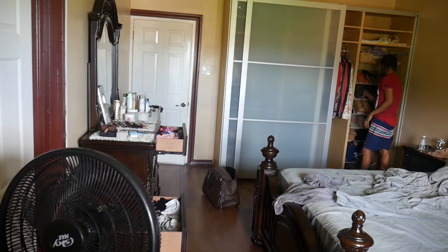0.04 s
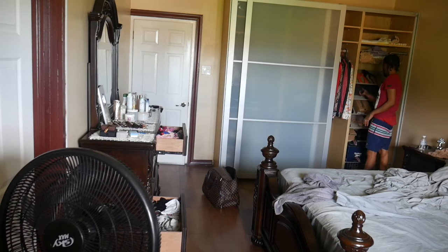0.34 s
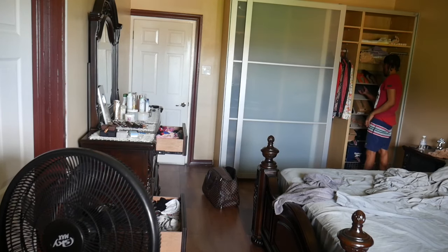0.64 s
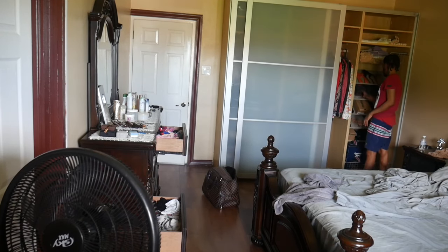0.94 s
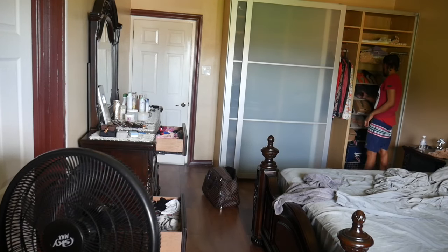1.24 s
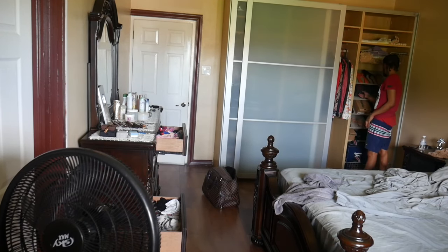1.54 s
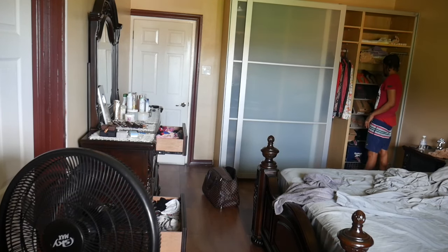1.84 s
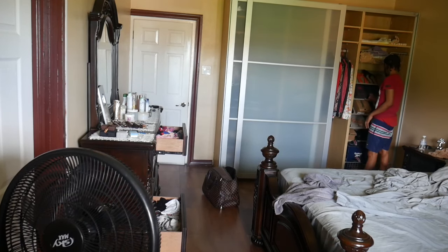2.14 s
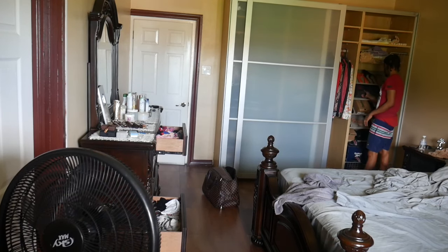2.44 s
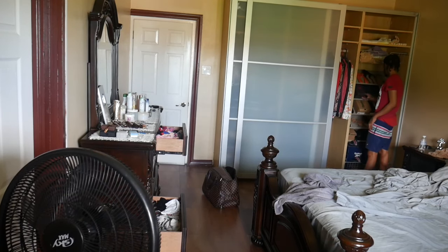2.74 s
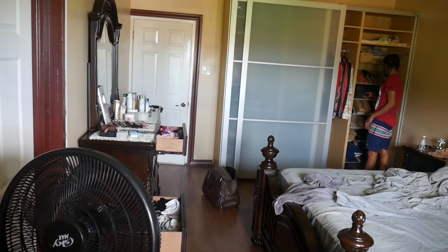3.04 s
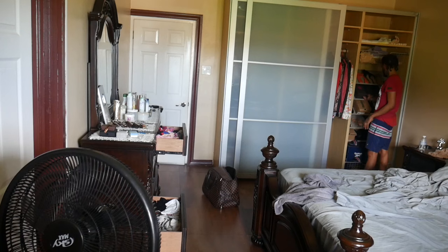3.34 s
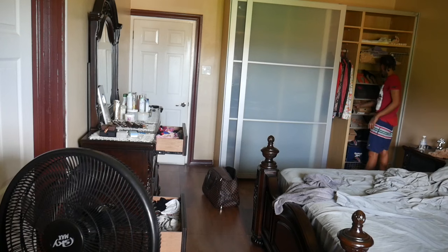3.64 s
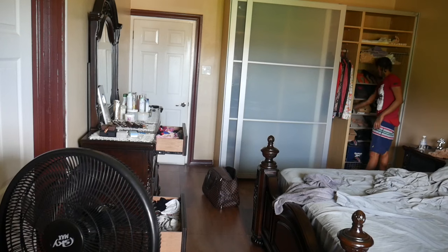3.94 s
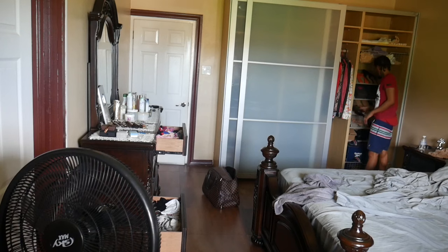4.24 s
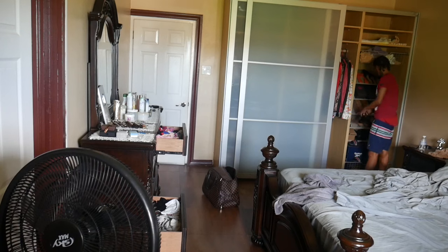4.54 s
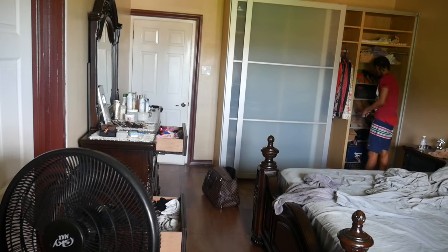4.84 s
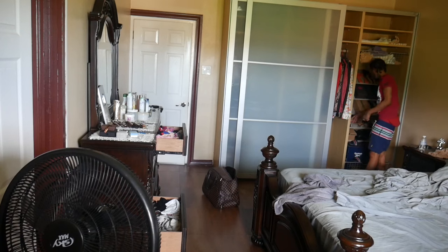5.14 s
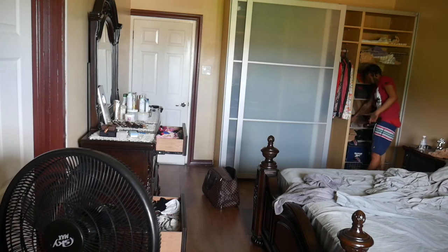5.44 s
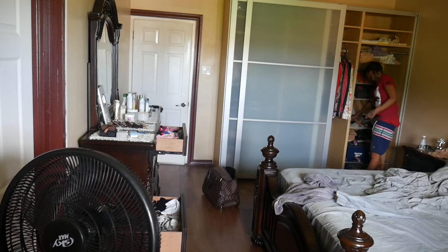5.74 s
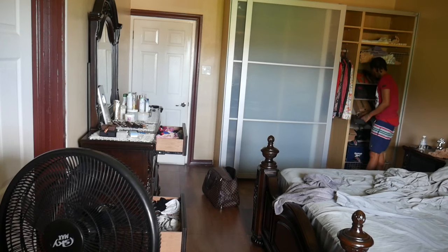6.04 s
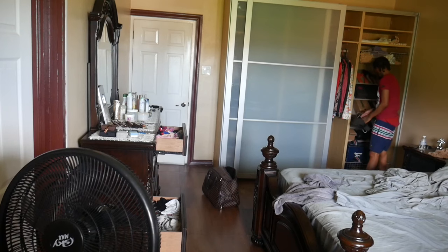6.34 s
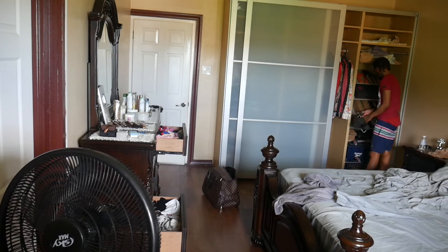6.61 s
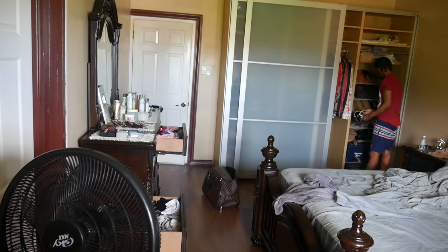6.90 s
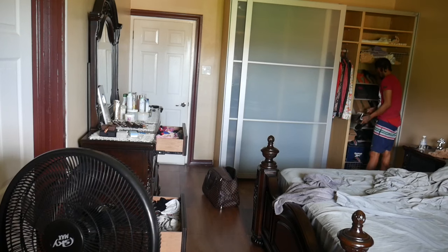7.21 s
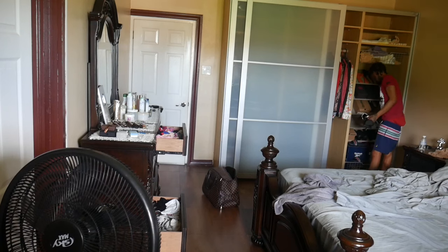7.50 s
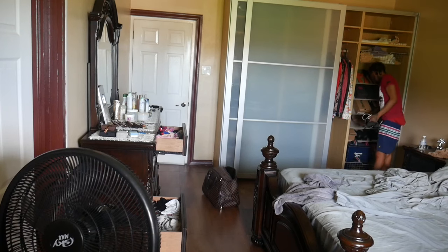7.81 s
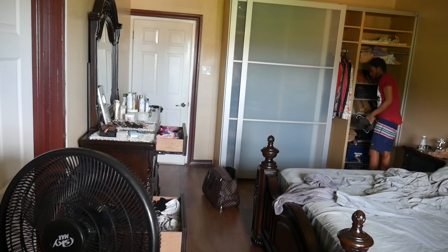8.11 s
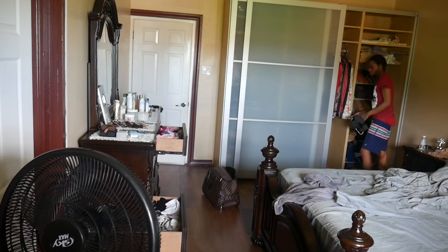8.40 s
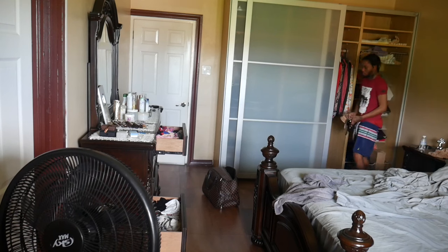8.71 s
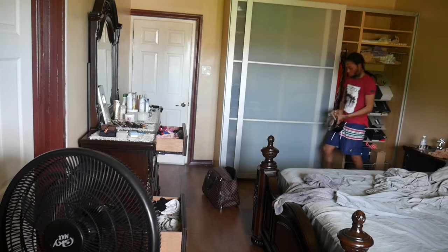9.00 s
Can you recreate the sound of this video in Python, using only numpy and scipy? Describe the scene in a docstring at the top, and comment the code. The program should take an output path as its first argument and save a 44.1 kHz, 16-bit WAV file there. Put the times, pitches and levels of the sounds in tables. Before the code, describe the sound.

Someone rummages through a wardrobe in a small, hard-floored bedroom. Things drag along a shelf and clothes rustle, then irregular wooden knocks set hangers, boxes and panels briefly ringing, the hardest about four seconds in. A lull, another scrape and a second lull lead to a last flurry of dragging, knocking and rustling. The microphone is across the room, picking up a short echo and a low steady hum.

```python
"""A small, hard-floored bedroom, the microphone across the room from a wardrobe where someone rummages.
Over a low steady hum, things are dragged along a shelf and clothes rustle. Knocks on the wood follow and
set hangers, boxes and panels ringing; the hardest lands at about 4 s. After a lull comes another scrape,
then a second lull, and from 7.4 s a last flurry of dragging, knocking and rustling.
The handling reaches the microphone through the room's short echo."""
import sys
import numpy as np
from scipy import signal
from scipy.fft import rfft, irfft, next_fast_len
from scipy.io import wavfile
from scipy.ndimage import uniform_filter1d

SR = 44100
rng = np.random.default_rng(int(sys.argv[2]) if len(sys.argv) > 2 else 0)


def wav_record(signal):
    """Record a signal, one row per channel, as 16-bit PCM in the file named by sys.argv[1]."""
    frames = np.transpose(np.atleast_2d(signal))
    bounded = np.clip(frames, -1, 1)
    # unit amplitude maps onto the largest positive 16-bit level
    quanta = np.round(bounded * 32767).astype(np.int16)
    wavfile.write(sys.argv[1], SR, quanta)


N = 408366
TIME = np.arange(N) / SR

# The wood's four registers: thud, body, clack, tick. Each row: low edge in Hz, high edge in Hz.
REGISTERS = [(45, 220), (220, 800), (800, 3200), (3200, 15000)]
# The things that ring in the wardrobe, named in the table of bumps.
# Each row: centre of a cluster of modes in Hz, its width in Hz, level in dB, t60 in seconds.
HANGER = [(814, 12, 5.5, 0.1), (2870, 950, -9.5, 0.12)]
SMALL_BOX = [(296, 41, 0, 0.62)]
LARGE_BOX = [(174, 6.7, -11.5, .48), (254, 12.3, -2, 0.47), (315, 9.4, -1, 0.43), (345, 8.4, -8.5, 0.51)]
THIN_PANEL = [(421, 36, 0, 0.099)]
SIDE_WALL = [(67.8, 4, -15, 0.87), (108, 14, -6.5, 0.93), (130, 55, -1, 0.4), (189.4, 26, -14.5, 0.32)]
SHELF = [(574, 30, -1, 0.45), (941, 47, 1.5, 0.22), (2970, 480, -9.5, 0.34)]
HARD_BOARD = [(577, 20, 2, 0.19), (1287, 12, -6.5, 0.58), (1622, 6, -1.5, .39), (1664, 8, -4.5, .37),
              (1987, 8, -1.5, .52), (2680, 14, -4, .43), (2730, 8.3, -42, 1.8), (3320, 190, -7, 0.39),
              (11000, 4400, -22, 0.57)]
SCUFFED_EDGE = [(2226, 1000, 0, 0.39)]
SCUFFED_BOARD = [(487, 90, -5.5, 0.46), (960, 91, -2, 0.48), (1260, 60, -4, 0.47), (1518, 180, -5.5, 0.38)]


def amp(db):
    """Decibels to gain."""
    return 10 ** (np.asarray(db) / 20)


def evened(x):
    """Scales each row to an rms of 1."""
    return x / np.sqrt(np.mean(x ** 2, axis=-1, keepdims=True) + 1e-20)


def spectrum(points, hz):
    """Gain of a (Hz, dB) table on a log-frequency axis."""
    f, db = np.transpose(points)
    return amp(np.interp(np.log(hz + 1), np.log(f + 1), db))


def coloured(x, gain):
    """Filters each row by gain(Hz), to an rms of 1."""
    count = x.shape[-1]
    size = next_fast_len(count)
    shaped = rfft(x, size) * gain(np.fft.rfftfreq(size, 1 / SR))
    return evened(irfft(shaped, size)[..., :count])


def add(mix, s, sound):
    """Lays a sound into the mix at s seconds."""
    part = mix[round(s * SR):][:len(sound)]
    part += sound[:len(part)]


def wander(count, hz):
    """A random curve that glides to a new value hz times a second."""
    steps = rng.standard_normal(4000)
    return np.interp(np.arange(count) / SR * hz, np.arange(len(steps)), steps)


def still_room(air_db=-52, waver=0.2):
    """Low rumble of the house with a few wavering tones."""
    # Each row: frequency in Hz, relative level of the room's air in dB.
    air_colour = [(12, -43), (20, -13), (41, -10), (103, -2.5), (333, -9.5), (372, -17.5), (404, -16.5),
                  (649, -23), (767, -22), (857, -22.5), (1720, -26.5), (1920, -26.5), (2610, -28.5),
                  (3450, -36), (15500, -43.5)]
    # Each row: pitch of a tone in Hz, level in dB.
    tones = [(101, -60), (155, -64.5), (2700, -81)]
    air = amp(air_db) * coloured(rng.standard_normal(N), lambda hz: spectrum(air_colour, hz))
    hum = sum(amp(db) * np.sin(2 * np.pi * hz * TIME + wander(N, 5)) * (1 + waver * wander(N, 4))
              for hz, db in tones)
    return air + np.sqrt(2) * hum


def microphone_hiss(level_db=-77):
    """The microphone's own faint, steady noise."""
    # Each row: frequency in Hz, relative level in dB.
    colour = [(100, 1.5), (1000, -4), (4000, -20.5), (7000, -10.5), (12000, -1.5), (15500, -2.5)]
    return amp(level_db) * coloured(rng.standard_normal(N), lambda hz: spectrum(colour, hz))


def stroke(start, length, crest):
    """Speed of one arm movement, 0 to 1: fastest at the share `crest` of its length."""
    progress = np.clip((TIME - start) / length, 0, 1)
    skew = np.log(.5) / np.log(crest)
    return np.sin(np.pi * progress ** skew)


def wardrobe(push, register):
    """One register of the wardrobe's answer to a push: broad colour with panel resonances."""
    # Wood heard across the room. Each row: frequency in Hz, relative level in dB.
    wood = [(35, -29), (55, 5.5), (110, -1), (300, 1.5), (450, -2.5), (1000, -3.5), (2300, -8.5),
            (3100, -15.5), (4000, -24.5), (7000, -34), (11000, -44.5), (15500, -54)]
    # Panel and shelf resonances. Each row: centre in Hz, width in Hz, dB above the broad colour.
    panels = [(70, 20, 2.5), (112, 15, 7.5), (158.7, 8.7, 12.5), (235.6, 8.2, 6.5), (319, 11.4, 4.5),
              (441, 11, 4), (540, 51, 2), (654, 4.9, 7.5), (840, 150, 0), (1273, 10, -1), (1614, 13, -12),
              (1980, 17, 3.5), (2300, 68, 4.5), (2640, 11, 6), (2933, 32, 3.5)]
    low, high = register

    def gain(hz):
        peaks = 1 + sum((amp(db) - 1) / (1 + (2 * (hz - f) / width) ** 2) for f, width, db in panels)
        band = 1 / np.sqrt((1 + (low / (hz + 1)) ** 12) * (1 + (hz / high) ** 12))
        return spectrum(wood, hz) * peaks * band
    return coloured(push, gain)


def reflections(t, spiky=0.41, blur_s=0.075):
    """Echoes off the walls: separate at first, then merging into a smooth wash."""
    sign, size = rng.standard_normal((2, len(t)))
    spread = spiky * np.exp(-t / blur_s)
    return sign * np.exp(spread * size - spread ** 2)


def dying(t, rise_s, t60, early, early_s=0.015):
    """Quick rise, a short burst of direct sound and nearest reflections, then a steady decay."""
    return (1 - np.exp(-t / rise_s)) * amp(-60 * t / t60) * (1 + early * np.exp(-(t / early_s) ** 2))


def bedroom(x, t60=0.59, early=1.1):
    """Carries a continuous sound across the room to the microphone."""
    t = np.arange(SR // 2) / SR
    response = reflections(t) * dying(t, 0.0015, t60, early)
    return signal.fftconvolve(x, response / np.linalg.norm(response))[:N]


def drags(level_db=-1, slips_per_s=300, judder_db=3):
    """A dragged thing sticks and slips: a stream of uneven little blows shakes the shelf."""
    # Each row: start of a pull in seconds, length in seconds, rumble in dB, scrape in dB.
    pulls = [(-.12, 0.19, -33, -51), (.15, 0.49, -33, -56), (5.37, 0.32, -31.5, -36),
             (7.43, 0.17, -49, -45.5), (7.636, 0.12, -51, -34.5)]
    out = np.zeros(N)
    for start, length, rumble_db, scrape_db in pulls:
        force = stroke(start, length, crest=0.65)[(TIME >= start) & (TIME < start + length)]
        count = len(force)
        chance, size = rng.random(N)[:count], rng.standard_normal(N)[:count]
        slips = size * (chance < slips_per_s / SR) * amp(judder_db * wander(count, 74.5))
        slips /= np.sqrt(abs(uniform_filter1d(slips ** 2, size=2500)) + 1e-5)  # the hand pulls evenly
        body_db = (rumble_db + scrape_db) / 2 - 3
        for db, register in zip([rumble_db, body_db, scrape_db], REGISTERS):
            add(out, max(start, 0), amp(db) * force * wardrobe(slips, register))
    return amp(level_db) * bedroom(out)


def clothes(level_db=0.5, idle_db=-74.5, creases_per_s=600, clump_db=3.5, uneven_db=4, swish=0.081):
    """Fabric swishes and its creases snap in small clumps, a few of them much louder than the rest."""
    # Each row: frequency in Hz, relative level of the fabric in dB.
    colour = [(200, 11.5), (450, 10), (1500, 8), (2600, 9.5), (4000, 3), (7000, -4), (11000, -9),
              (13500, -14), (15500, -21)]
    # Handfuls pushed aside or lifted. Each row: start in seconds, length in seconds, level in dB,
    # sheen in dB (silkier cloth has more top treble).
    handfuls = [(-.1, 0.22, -47.5, 2), (0.104, 0.5, -50.5, 3), (0.907, 0.28, -46.5, -3.5),
                (1.219, 0.28, -50, -9), (1.539, 0.12, -36, -1.5), (1.996, 0.058, -55, 5),
                (2.177, 0.12, -59, 5), (2.26, .16, -51, -5), (3.454, 0.21, -52, -19), (3.73, 0.059, -51, 3),
                (5.165, 0.66, -57, 3), (5.441, 0.26, -47, -1.5), (6.27, 0.2, -66, 4), (6.68, 0.2, -76, 14),
                (7.4, 0.25, -48.5, -4.5), (7.7, 0.49, -60, -1), (8.096, 0.22, -52, 5.5),
                (8.242, 0.32, -50, 7), (8.46, 0.34, -54, 2), (8.768, 0.36, -50, 3.5),
                (9.087, 0.39, -47.5, 3)]
    size = rng.choice([-1, 1], N) * amp(uneven_db * np.minimum(rng.exponential(1, N), 4))
    creases = evened(size) * (rng.random(N) < creases_per_s / SR)
    grain = (creases + swish * rng.standard_normal(N)) * amp(clump_db * wander(N, 40))
    cloth = coloured(grain, lambda hz: spectrum(colour, hz))
    treble = signal.sosfiltfilt(signal.butter(2, 6500, "high", fs=SR, output="sos"), cloth)
    handled = sum(amp(db) * stroke(start, length, crest=0.44) * (cloth + (amp(sheen_db) - 1) * treble)
                  for start, length, db, sheen_db in handfuls)
    stirring = amp(idle_db) * cloth
    return amp(level_db) * bedroom(handled + stirring)


def knocks(clack_db=-5, tick_db=-14.5, ordinary_db=-34.5, rebound_s=0.053, rebound_rise_s=0.006):
    """A thing hits wood, rocks back and lands again, duller; each has its own path to the microphone."""
    # Each row: time in seconds, strength in dB, hardness in dB (tick up, body down),
    # weight in dB (extra thud), contact time in seconds (long for a glancing scuff).
    hits = [(0.107, -36, -2.5, 1.5, 0.0098), (0.153, -33.5, 4, -6, 0.0015),
            (0.261, -31.5, 4.5, 0.5, 0.00056), (0.345, -34.5, 3, 4, .001),
            (0.358, -38.5, -8.5, -10, 0.0017), (0.427, -37, -2.5, -15, .0008), (0.537, -48, 5, 4, .001),
            (0.576, -42.5, 3.5, -5, 0.00087), (0.66, -45.5, -1.5, 14, 0.0039), (0.762, -37, 1, -5, .0028),
            (0.826, -24, 6, -5, 0.003), (1.277, -44, 0, 0, 0.0016), (1.394, -36, 4, -7, 0.0026),
            (1.521, -27, 4.5, -3, 0.0013), (1.58, -42.5, 12, 2, .003), (1.686, -36, 3.5, -11, 0.0009),
            (1.75, -41.5, 3, 3.5, .001), (1.928, -56.5, -2, 6, 0.00092), (2.195, -46, 3, -9, .0018),
            (2.399, -46.5, 0, 6, .001), (2.549, -45, 0.5, 4, .001), (2.588, -33, -5.5, -5, 0.0047),
            (2.602, -25, 0.5, 2.5, 0.0022), (2.855, -41.5, 0, 9.5, .0008), (3.195, -33, 2.5, -3.5, 0.006),
            (3.612, -47.5, 4, -8, .002), (3.685, -27.5, -1, -7.5, 0.0039), (3.74, -33, -3, 3, .001),
            (3.803, -33.5, -4, -2, 0.0035), (3.85, -40.5, -6.5, 11, .001), (3.984, -39.5, -5.5, 2, .001),
            (4.084, -17.5, 0, -5, 0.00082), (4.852, -64.5, 13.5, 0, 0.0009), (5.41, -38.5, 3.5, -1, 0.012),
            (5.51, -41.5, 1, -5, .001), (5.725, -50, 13.5, -9, .0007), (5.826, -51.5, 11.5, -20, 0.00076),
            (6.067, -39.5, 3, -6.5, 0.0038), (6.301, -48.5, 1, -19, .001), (7.687, -41, 5.5, -7, 0.013),
            (7.737, -39, 0.5, -4, 0.0048), (7.831, -36.5, -3.5, 0.5, 0.0018),
            (7.846, -40, -9.5, 11, 0.0011), (8.14, -46.5, -1.5, 2, .001), (8.158, -42.5, 7, -4, 0.0032),
            (8.462, -43, 1, 4, .0008), (8.561, -40.5, 7.5, -19, 0.0033), (8.723, -40, 3.5, -2, 0.0095),
            (9.133, -47.5, -2.5, -3, 0.0039), (9.179, -55, 14.5, -8, 0.00092)]
    # The room's echo, thud to tick. Each row: rise in seconds, t60 in seconds, extra early gain.
    echoes = [(0.015, 0.59, 0.62), (0.0048, 0.51, 0.15), (0.00049, 0.56, 0.7), (0.00037, 0.52, 0.71)]
    rebound_db = [-5, -12, -14, -16.5]  # thud to tick
    out, t = np.zeros(N), np.arange(SR // 2) / SR
    times, strength, hardness, weight, contact_s = np.transpose(hits)
    crack_db = 0.1779 * (strength - ordinary_db)  # firmer blows crack more in the midrange
    levels = strength + np.array([weight, -hardness, clack_db + crack_db, tick_db + hardness])
    pressing = 1 - np.exp(-(t / contact_s[:, None]) ** 2)  # the force grows over the contact time
    soft_landing = 1 - np.exp(-t / rebound_rise_s)
    paths = np.array([[reflections(t) for _ in REGISTERS] for _ in hits])
    for k, (register, echo) in enumerate(zip(REGISTERS, echoes)):
        blows = wardrobe(paths[:, k], register) * dying(t, *echo) * pressing
        rebounds = np.roll(blows, 1, axis=0)
        for s, db, blow, rebound in zip(times, levels[k], blows, rebounds):
            add(out, s, amp(db) * blow)
            add(out, s + rebound_s, amp(db + rebound_db[k]) * soft_landing * rebound)
    return out


def rings(rise_s=0.0019, steady=0.58):
    """Bumped things ring, their close modes beating as they die: the wider the cluster, the faster."""
    # Each row: time in seconds, the thing bumped or scraped, strength in dB.
    bumps = [(.158, HANGER, -43), (.262, HANGER, -32.5), (0.287, SMALL_BOX, -33.5), (.359, HANGER, -27.5),
             (.378, SMALL_BOX, -30.5), (0.769, LARGE_BOX, -38), (.83, HANGER, -34),
             (0.874, LARGE_BOX, -24.5), (1.278, HANGER, -45), (1.304, SMALL_BOX, -41),
             (1.53, THIN_PANEL, -31), (1.717, SIDE_WALL, -35.5), (2.605, SHELF, -27),
             (3.208, SMALL_BOX, -38), (3.704, SIDE_WALL, -23), (4.087, HARD_BOARD, -24.5),
             (5.292, SCUFFED_EDGE, -59), (5.54, THIN_PANEL, -34.5), (5.595, SCUFFED_BOARD, -36.5),
             (6.069, THIN_PANEL, -35), (6.122, THIN_PANEL, -41), (7.464, SCUFFED_EDGE, -46),
             (7.566, SCUFFED_EDGE, -45), (7.692, SCUFFED_BOARD, -37.5), (7.739, SCUFFED_BOARD, -33.5),
             (7.835, SCUFFED_BOARD, -34.5), (8.236, SCUFFED_EDGE, -49), (8.464, SIDE_WALL, -34),
             (8.566, SCUFFED_EDGE, -38), (8.729, SCUFFED_BOARD, -43.5), (8.916, SCUFFED_EDGE, -46.5)]
    out, t = np.zeros(N), np.arange(2 ** 15) / SR
    for s, thing, strength_db in bumps:
        for hz, width, db, t60 in thing:
            beating = evened(abs(steady + wander(len(t), width) + 1j * wander(len(t), width)))
            drift = np.sqrt(np.pi * width / SR) * np.cumsum(rng.standard_normal(len(t)))
            phase = 2 * np.pi * hz * t + uniform_filter1d(drift, int(SR / width / 2) + 1)
            cluster = np.sqrt(2 * beating) * np.sin(phase)
            add(out, s, amp(strength_db + db) * cluster * dying(t, rise_s, t60, early=0))
    return out


def scene():
    """Wardrobe and room sit dead centre; only the microphone hiss has width."""
    middle = knocks() + rings() + drags() + clothes() + still_room()
    side = microphone_hiss()
    return np.array([middle + side, middle - side])


def record(dry, edge_hz=15700):
    """The recorder's band limit."""
    lowpass = signal.firwin(511, edge_hz, window=("kaiser", 9), fs=SR)
    return signal.oaconvolve(dry, lowpass[None], "same", axes=1)


dry = scene()
out = record(dry)
wav_record(out)
```